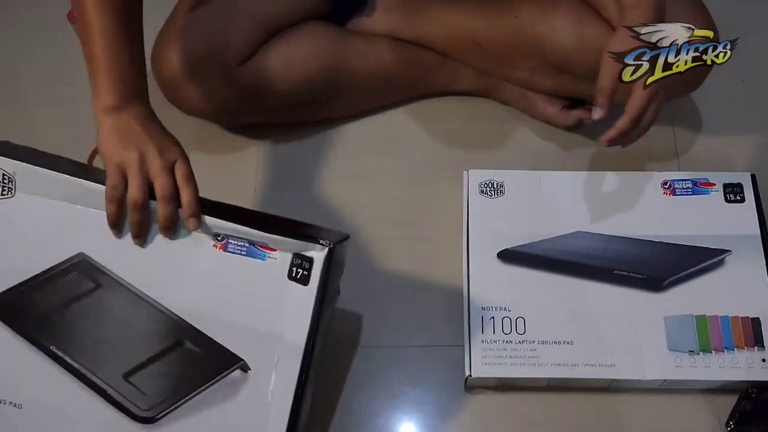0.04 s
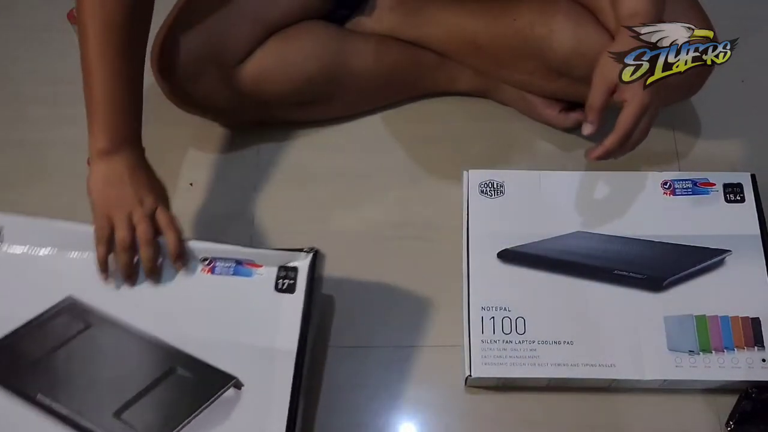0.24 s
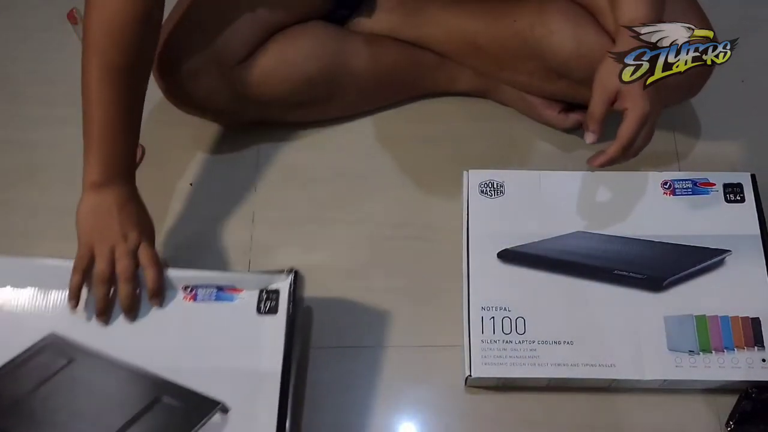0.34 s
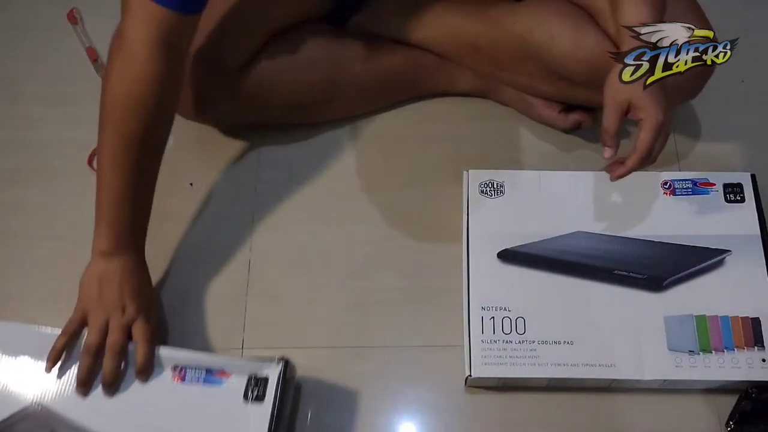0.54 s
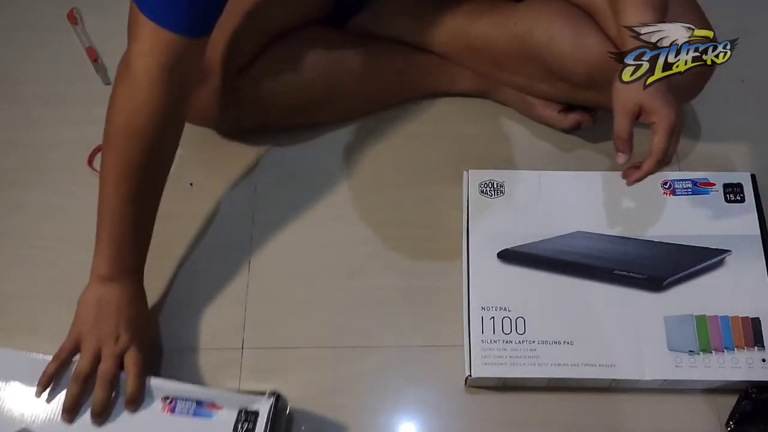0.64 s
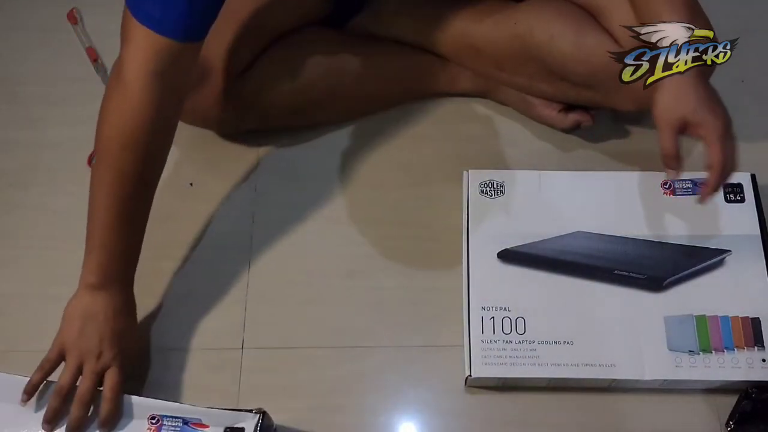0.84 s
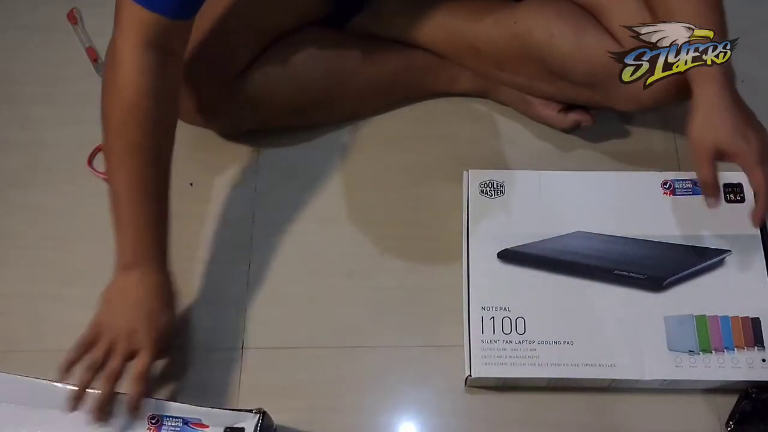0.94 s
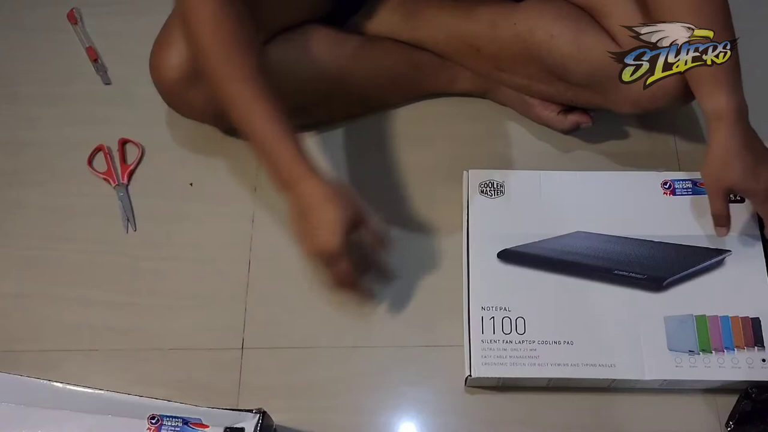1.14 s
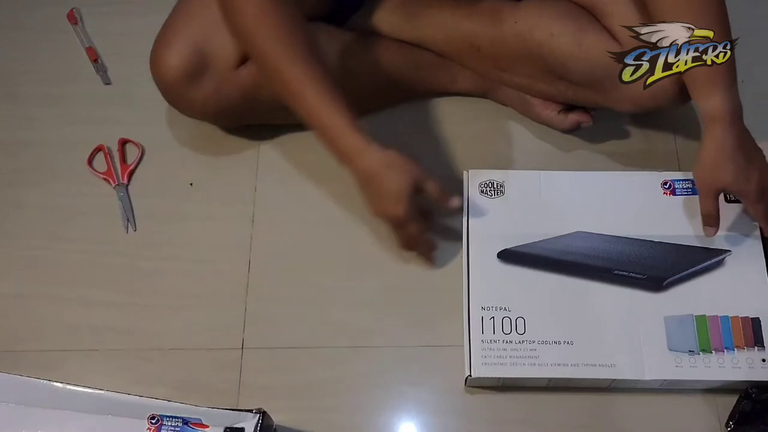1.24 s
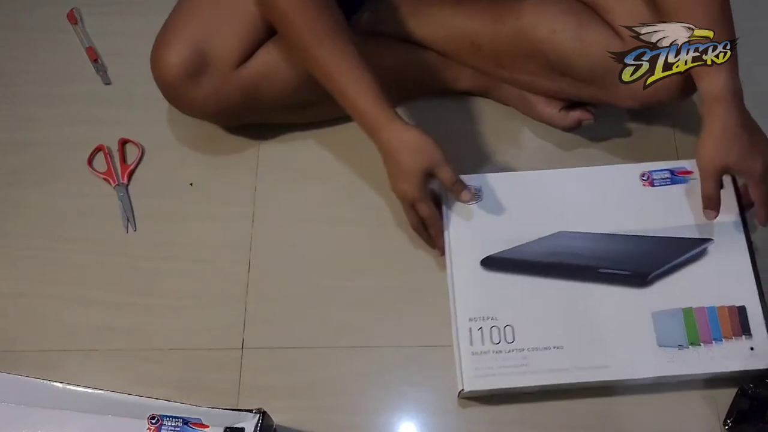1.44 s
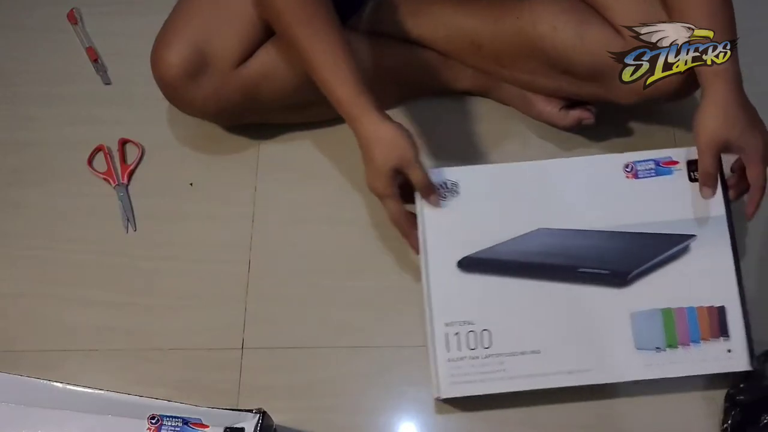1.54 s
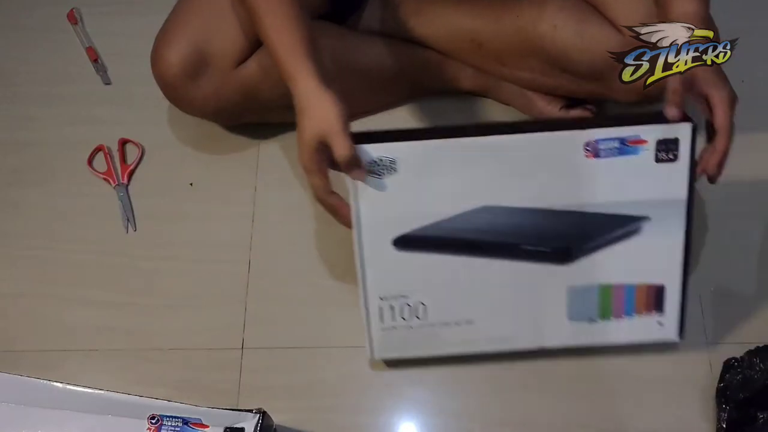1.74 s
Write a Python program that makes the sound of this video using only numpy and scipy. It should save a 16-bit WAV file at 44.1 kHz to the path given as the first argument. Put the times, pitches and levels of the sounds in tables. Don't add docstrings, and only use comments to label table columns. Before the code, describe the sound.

A hollow cardboard box scrapes over floor tiles, slaps down loudly, then a second box knocks softly

```python
import sys
import numpy as np
from scipy import signal
from scipy.fft import rfft, irfft
from scipy.io import wavfile
from scipy.ndimage import uniform_filter1d

SR = 44100
rng = np.random.default_rng(int(sys.argv[2]) if len(sys.argv) > 2 else 0)


def voltage_ratio(level):
    return 10 ** (np.asarray(level, float) / 20)


def waveform_to_disk(signal):
    frames = np.transpose(np.atleast_2d(signal))
    scaled = np.clip(frames, -1, 1) * 32767
    samples = np.round(scaled).astype(np.int16)
    wavfile.write(sys.argv[1], SR, samples)


N = 79380

# (frequency [Hz], level [dB], t60 [s])
BIG_BOX_MODES = [(277, 1, 0.065), (322, 8.5, 0.045), (420, 1.5, 0.057), (485, 10, 0.047),
                 (614, -0.5, 0.031), (658.8, 5.5, 0.084), (690, 6.5, 0.13), (810, 5.5, 0.079),
                 (943, 14, 0.046), (1002, -5, 0.031), (1310, -16, 0.089), (1412, 9, 0.07),
                 (1844, -1, 0.049), (2550, 6, 0.029)]
PATCHY_DB = 1.2


def evened(x):
    return x / np.sqrt(np.mean(x ** 2) + 1e-20)


def read(points, hz):
    f, value = np.transpose(points)
    return np.interp(np.log(hz + 1), np.log(f + 1), value)


def add(mix, s, sound):
    part = mix[max(round(s * SR), 0):][:len(sound)]
    part += sound[:len(part)]


def hump(hz, centre_hz, octaves):
    distance = np.log2((hz + 1) / centre_hz) / max(octaves, 0.1)
    return np.exp(-0.5 * distance ** 2)


def coloured(x, gain):
    return irfft(rfft(x) * gain(np.fft.rfftfreq(len(x), 1 / SR)), len(x))


def noise(shape_db, patchy_db, grit_db, per_s):
    frames = N // 128 + 6
    real, imaginary, patches = rng.standard_normal((frames, 257, 3)).T
    patches = uniform_filter1d(patches, size=8, axis=0)
    patches = evened(uniform_filter1d(patches, size=12, axis=1))
    grit = np.minimum(rng.exponential(1, frames), 4) * (rng.random(frames) < per_s * 128 / SR)
    spectrum = (real + 1j * imaginary) * voltage_ratio(patchy_db * patches + grit_db * grit)
    x = signal.istft(spectrum, nperseg=512, noverlap=384)[1][:N]
    return evened(coloured(x, lambda f: voltage_ratio(shape_db(f))))


def slide():
    # (time [s], drag level [dB], fine hiss level [dB])
    slide_levels = [(0, -42, -78), (0.048, -37, -58), (.2, -41, -46), (0.399, -29.5, -64),
                    (0.621, -41, -48.5), (.75, -41, -50), (0.871, -43, -47), (1.05, -47, -50.5),
                    (1.17, -40.5, -46.5), (1.3, -66.5, -69), (1.449, -62, -86), (1.55, -49.5, -64),
                    (1.68, -47.5, -54), (1.74, -38.5, -54), (1.8, -46.5, -48.5)]
    # (frequency [Hz], level [dB])
    drag_spectrum = [(60, -14), (150, -18), (270, -2.5), (600, -6), (1200, -5.5), (2200, -12.5),
                     (3500, -21.5), (8000, -29.5)]
    # (frequency [Hz], width [Hz], level [dB])
    drag_peaks = [(1148, 34, 9.4), (1560, 45, 6.7)]
    # (frequency [Hz], level [dB])
    hiss_spectrum = [(1500, -7.5), (3000, -43), (6000, -8.5), (11000, -8), (14000, -3), (15500, 3)]

    def drag_shape(f):
        peaks = sum(db / (1 + (2 * (f - hz) / width) ** 2) for hz, width, db in drag_peaks)
        return read(drag_spectrum, f) + peaks

    s, drag_db, hiss_db = np.transpose(slide_levels)
    t = np.arange(N) / SR
    drag = noise(drag_shape, 2 * PATCHY_DB, grit_db=0.5, per_s=67)
    hiss = noise(lambda f: read(hiss_spectrum, f), PATCHY_DB, grit_db=0.94, per_s=60)
    return drag * voltage_ratio(np.interp(t, s, drag_db) - 1.0) + hiss * voltage_ratio(np.interp(t, s, hiss_db) + 3)


def quiet_air():
    # (frequency [Hz], level [dB])
    air_spectrum = [(40, -21), (100, 0.5), (500, 1.5), (1200, -4), (2000, -9.5), (4000, -13), (9000, -18.5),
                    (15500, -13.5)]
    return voltage_ratio(-54) * noise(lambda f: read(air_spectrum, f), PATCHY_DB, grit_db=0, per_s=0)


def blow(modes, peak_db, centre_hz, chatter_s, octaves):
    t = np.arange(8192) / SR
    u, strength, hiss = rng.standard_normal((3, 8192))

    fade = np.clip(1 - t / max(chatter_s, 0.0005), 0, 1) ** 0.56
    hits = (abs(u) < 900 / SR) * strength * fade * 0.57
    hits[0] = 1

    ring = np.zeros(len(t))
    for hz, db, t60 in modes:
        bent_hz = hz * (1 + 0.04 * np.tanh(rng.standard_normal()))
        ring += voltage_ratio(db - 60 * t / t60) * hump(hz, centre_hz, octaves) * np.sin(2 * np.pi * bent_hz * t)

    def grain_gain(f):
        brighter_skirt = voltage_ratio(-21.5) * hump(f, 2.083 * centre_hz, 0.5)
        return hump(f, centre_hz, 0.98 * octaves) + brighter_skirt

    crackle_db, crackle_t60 = -5.5, 0.024
    wash_db, wash_t60 = -22, 0.14
    decay = voltage_ratio(crackle_db - 60 * t / crackle_t60) + voltage_ratio(crackle_db + wash_db - 60 * t / wash_t60)
    crackle = evened(coloured(hiss, grain_gain)) * decay

    contact = np.minimum(t * centre_hz * octaves / 0.21, 1)
    body = (ring / abs(ring).max() + crackle) * contact
    low_cut_hz = centre_hz / 2 ** (2.84 * octaves + 0.29)
    low_cut = signal.butter(2, low_cut_hz, "high", fs=SR)
    x = signal.lfilter(*low_cut, signal.fftconvolve(hits, body)[:8192])
    return voltage_ratio(peak_db) * x / abs(x).max()


def blows(modes, events):
    out = np.zeros(N)
    for s, *settings in events:
        add(out, s, blow(modes, *settings))
    return out


def drag_bumps():
    # (time [s], peak [dB], struck-panel centre [Hz], chatter [s], spread [octaves])
    bump_events = [(0.037, -22.5, 2040, 0.005, 0.42), (.074, -26.5, 800, 0.0089, 0.32),
                   (.149, -17, 710, 0.012, 0.24), (0.149, -21.5, 300, 0.023, 0.47),
                   (.2122, -9, 690, 0.001, 0.36), (0.2134, -11.5, 332, 0.00095, 0.17),
                   (.224, -15.5, 500, .006, 0.6), (.231, -20, 453, 0.004, 0.19),
                   (.242, -15.5, 610, 0.0074, 0.42), (.243, -22, 1500, 0.017, 0.53),
                   (0.253, -20.5, 512, 0.017, 0.31), (.268, -6, 1030, 0.0019, 0.58),
                   (.272, -23.5, 1700, 0.006, 0.48), (.29, -20.5, 855, 0.018, .5),
                   (0.3116, -11.5, 1570, 0.0023, 0.46), (0.314, -9, 880, 0.0083, 0.75),
                   (.319, -12, 477, 0.0073, 0.23), (.322, -17, 945, 0.01, 0.19),
                   (.332, -16, 475, 0.0086, 0.48), (.338, -14, 930, .02, .12),
                   (0.346, -16.5, 387, 0.0055, 0.18), (.366, -16, 597, 0.0065, 0.77),
                   (0.633, -29.5, 314, 0.021, 0.12), (0.659, -29, 364, 0.022, 0.56)]
    return blows(BIG_BOX_MODES, bump_events)


def snaps():
    # (time [s], peak [dB], centre [Hz], spread [octaves])
    snap_events = [(.037, -22, 9560, 0.25), (0.038, -23, 3100, 1.1), (.212, -28, 2900, 0.36),
                   (0.3095, -37, 2800, 0.31), (0.358, -27, 12700, 0.27), (0.375, -28, 5300, 0.21),
                   (0.377, -19.5, 10600, .35), (0.4094, -15.5, 3480, 0.33), (0.415, -18.5, 8700, 0.54),
                   (0.411, -25, 5400, 0.56), (.425, -25, 5000, 0.85), (0.27, -28, 2480, 0.23),
                   (.385, -22, 9100, 0.88), (.479, -27, 4900, 0.42), (0.598, -25, 10200, 0.99),
                   (.837, -31, 11100, .6), (.875, -31, 14000, 0.32), (0.889, -39, 9000, 0.49),
                   (1.018, -37.5, 8450, .3), (1.058, -34, 14600, 0.25), (1.132, -35.5, 6200, 0.12),
                   (1.1677, -19, 10800, 0.78), (1.169, -27.5, 5530, 0.59), (1.173, -27, 11100, 0.87),
                   (1.156, -32, 11000, .6), (1.523, -35.5, 2900, 0.65), (1.704, -34, 2470, 0.32),
                   (1.718, -28.5, 9000, 1.1), (1.697, -40, 9600, .3)]
    out, t = np.zeros(N), np.arange(2048) / SR
    crack_and_fizz = voltage_ratio(-60 * t / 0.0052) + voltage_ratio(-12.5 - 60 * t / 0.057)
    for s, db, hz, octaves in snap_events:
        x = coloured(rng.standard_normal(2048), lambda f: hump(f, hz, octaves) + 0.07 * (f > 2500))
        x *= crack_and_fizz
        add(out, s, voltage_ratio(db) * x / abs(x).max())
    return out


def hollow_thuds():
    # (time [s], level [dB], frequency [Hz], t60 [s])
    thud_events = [
        (0.375, -26, 84, 0.18),
        (0.482, -46, 203, 0.019),
        (1.169, -22.5, 129, 0.11),
        (1.524, -45, 94.4, 0.083),
        (.2122, -4.5, 690, 0.023),
        (1.1515, -16, 833, 0.038),
        (1.1685, -13, 784, 0.035),
        (1.7025, -9, 348, 0.032),
    ]
    out, t = np.zeros(N), np.arange(12000) / SR
    for s, db, hz, t60 in thud_events:
        onset = np.minimum(t / min(1.5 / hz, 0.004), 1)
        add(out, s, voltage_ratio(db - 60 * t / t60) * np.sin(2 * np.pi * hz * t) * onset)
    return out


def slap_down():
    # (time [s], peak [dB], struck-panel centre [Hz], chatter [s], spread [octaves])
    slap_events = [(.3745, -10, 1025, .002, 0.45), (.3772, 0, 420, 0.0025, 0.43),
                   (.386, -5, 468, 0.001, 0.63), (.392, -12, 333, .003, 0.53),
                   (.397, -14, 645, 0.0016, 0.73), (.4086, 0.5, 810, 0.0027, 0.6),
                   (.414, -1, 520, 0.0044, 0.72), (.419, -5.5, 910, 0.0017, 0.77),
                   (.4235, -9, 750, .003, 0.68), (.4283, -1.5, 970, 0.0032, 0.46),
                   (.435, -6, 1200, 0.0082, 0.56), (.4395, -3.5, 664, 0.0042, 0.65),
                   (.445, -5, 900, 0.0055, 0.69), (.449, -8, 1130, 0.0029, 0.43),
                   (.455, -6, 1220, 0.0033, 0.67), (.466, -7.5, 1010, 0.0055, 0.39),
                   (.472, -14, 920, 0.0038, 0.65), (.4795, -5.5, 748, 0.0041, 0.83),
                   (0.4842, -7.5, 485, 0.0011, 0.42), (.481, -10.5, 272, 0.016, 0.36),
                   (0.496, -12, 576, 0.011, 0.77), (.511, -13.5, 715, 0.0033, 0.55),
                   (.524, -32, 720, .006, 0.17), (.535, -20, 577, 0.012, 0.58),
                   (.549, -17.5, 700, .015, 0.3)]
    return blows(BIG_BOX_MODES, slap_events)


def flat_box_knocks():
    # (frequency [Hz], level [dB], t60 [s])
    flat_box_modes = [(129, -7, .1), (260, 2.5, 0.078), (338, 10.5, 0.046), (386, 4.5, 0.075),
                      (435, 1.5, 0.048), (515, 2, 0.039), (635, 1, 0.072), (760, 8, 0.045),
                      (800, -37, 0.029), (1072, 13, 0.016), (1450, -6.5, 0.031), (2137, 7.5, 0.01)]
    # (time [s], peak [dB], struck-panel centre [Hz], chatter [s], spread [octaves])
    knock_events = [(1.091, -34.5, 390, 0.042, 0.24), (1.108, -28.5, 414, 0.0054, 0.17),
                    (1.127, -32, 760, 0.02, 0.17), (1.144, -31, 780, 0.0037, 0.2),
                    (1.158, -22, 600, .006, 0.84), (1.1661, -23, 2370, 0.0028, 0.32),
                    (1.1685, -10, 590, 0.0011, 0.77), (1.1712, -12, 760, .001, 0.37),
                    (1.174, -13.5, 1000, 0.0045, 0.57), (1.179, -13.5, 420, .002, 0.41),
                    (1.1836, -18, 473, .001, 0.48), (1.19, -28.5, 1760, 0.027, 0.37),
                    (1.198, -28.5, 700, .012, 0.47), (1.213, -27.5, 660, 0.024, 0.49),
                    (1.519, -34.5, 780, 0.0061, 0.31), (1.5239, -24.5, 398, 0.0013, 0.44),
                    (1.533, -32.5, 292, 0.0023, 0.22), (1.546, -37, 394, .02, 0.65),
                    (1.578, -37.5, 1450, .003, 0.18), (1.579, -33, 500, 0.0017, 0.23),
                    (1.632, -38.5, 572, 0.012, 0.15), (1.697, -30, 496, .004, .6),
                    (1.735, -39.5, 345, 0.023, 0.31), (1.704, -31, 706, 0.017, 0.29),
                    (1.7184, -30.5, 990, 0.001, 0.88), (1.726, -33.5, 600, .012, 0.88),
                    (1.782, -37.5, 396, 0.018, 0.5)]
    return blows(flat_box_modes, knock_events)


def room(x):
    # (frequency [Hz], t60 [s])
    room_decay = [(100, 0.36), (300, 0.36), (700, 0.32), (1500, 0.4), (4000, 0.4), (12000, 0.57)]
    taps = np.zeros(SR)
    at = np.arange(260, SR - 20, 20) + rng.integers(0, 20, (SR - 261) // 20)
    taps[at] = rng.choice([-1., 1.], at.shape)
    hz, t, z = signal.stft(taps, SR, nperseg=256)
    fading = z * voltage_ratio(-60 * t / read(room_decay, hz)[:, None])
    tail = signal.istft(fading, SR, nperseg=256)[1]
    return signal.fftconvolve(x, tail / np.linalg.norm(tail))[:N]


def scene():
    hits = drag_bumps() + snaps() + hollow_thuds() + slap_down() + flat_box_knocks()
    mix = slide() + quiet_air() + hits + voltage_ratio(-8) * room(hits)
    return mix[None]


def roll_off(x):
    return signal.sosfilt(signal.butter(12, 16820, fs=SR, output="sos"), x)


def record(dry):
    low_cut = signal.butter(4, 69.4, "high", fs=SR, output="sos")
    heard = signal.sosfilt(low_cut, dry)

    t = np.arange(N) / SR
    duck_from_s, duck_to_s, duck_db = 0.4, 0.4078, -8.5
    ducking = np.clip((t - duck_from_s) / (duck_to_s - duck_from_s), 0, 1) * (t < duck_to_s)
    heard = heard * voltage_ratio(duck_db * ducking)

    ceiling = 1.0
    held = heard / (1 + (abs(heard) / ceiling) ** 6) ** (1 / 6)
    band_edge = signal.firwin(511, 15600, window=("kaiser", 5), fs=SR)
    finished = signal.oaconvolve(held, band_edge[None], "same")
    return roll_off(finished)


dry = scene()
out = record(dry)
waveform_to_disk(out)
```